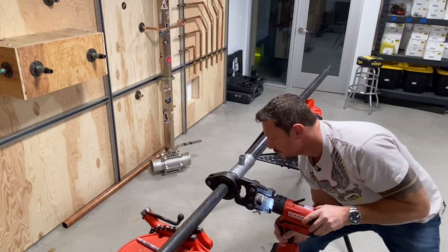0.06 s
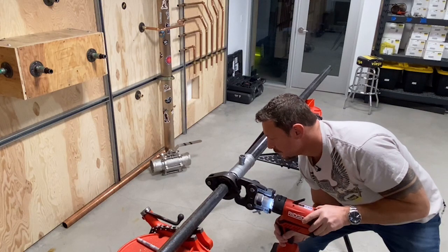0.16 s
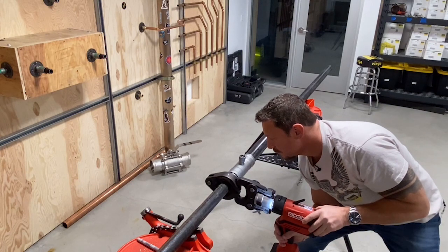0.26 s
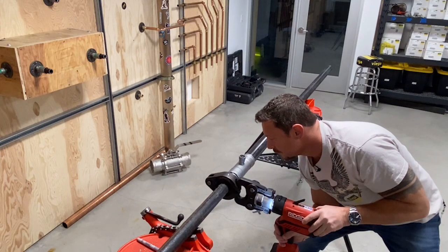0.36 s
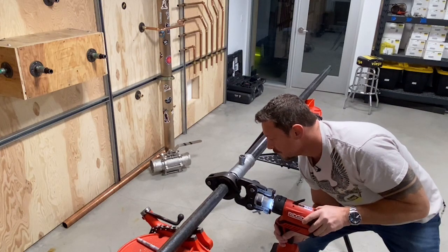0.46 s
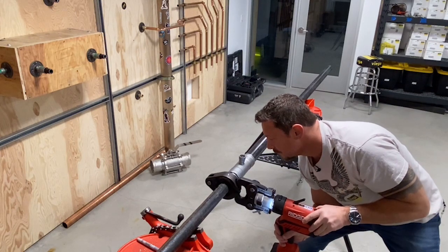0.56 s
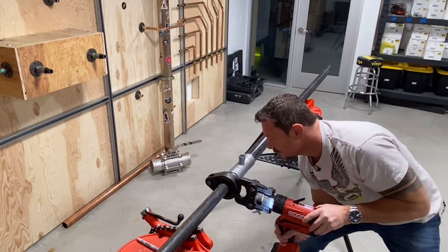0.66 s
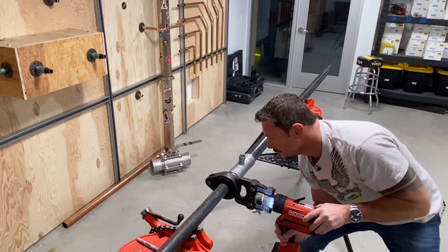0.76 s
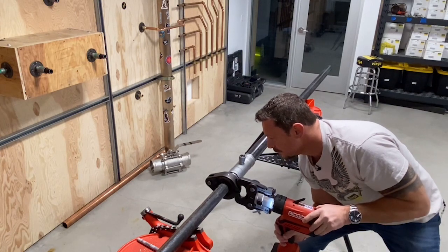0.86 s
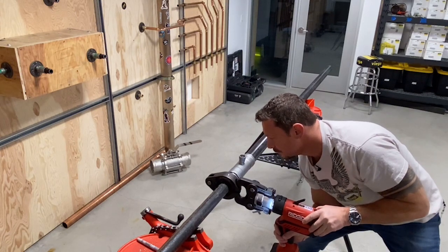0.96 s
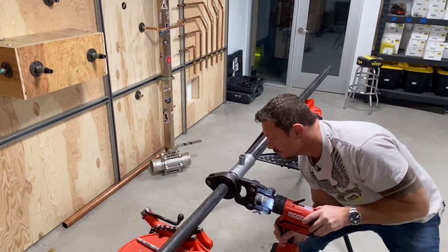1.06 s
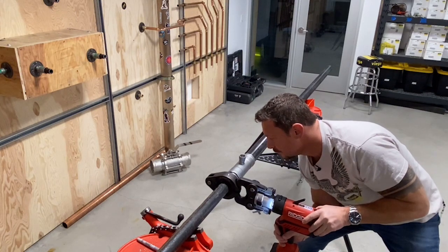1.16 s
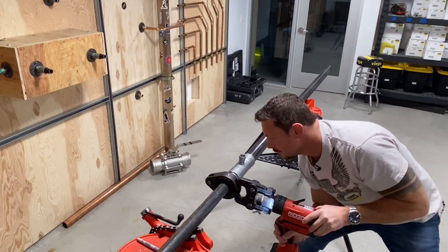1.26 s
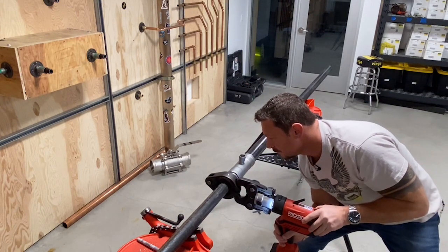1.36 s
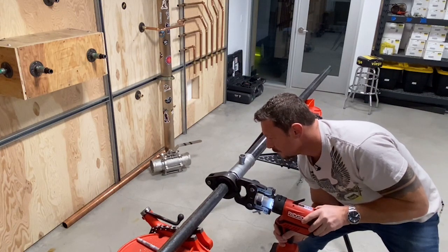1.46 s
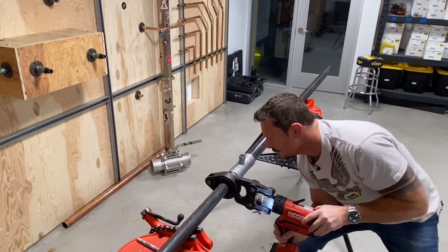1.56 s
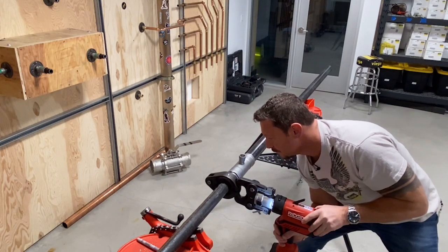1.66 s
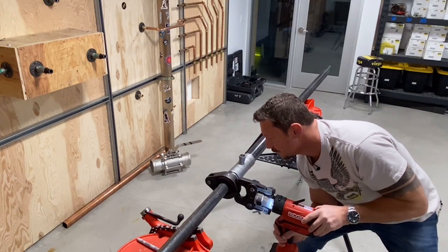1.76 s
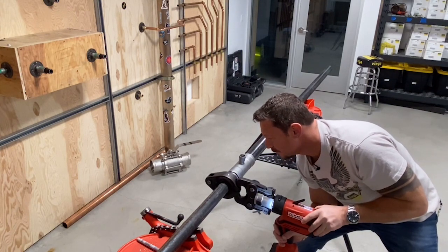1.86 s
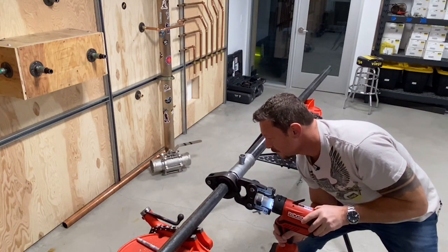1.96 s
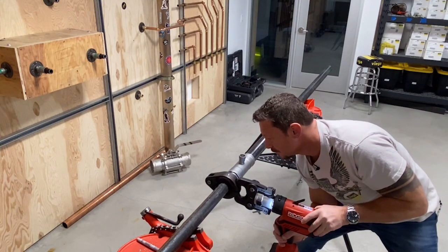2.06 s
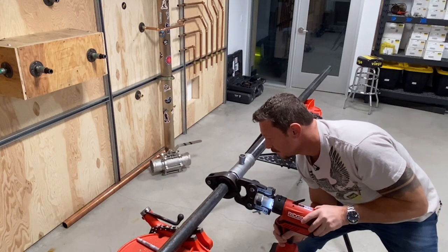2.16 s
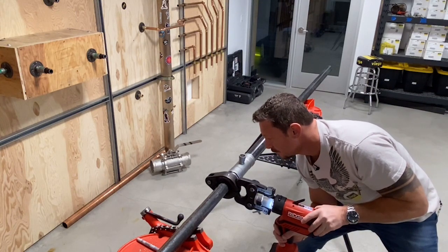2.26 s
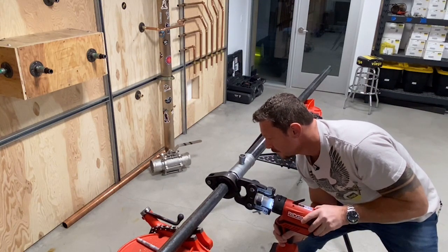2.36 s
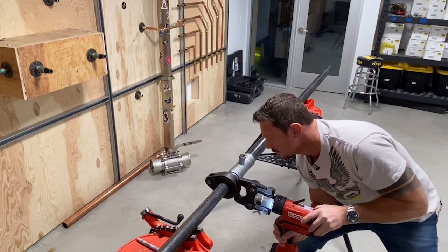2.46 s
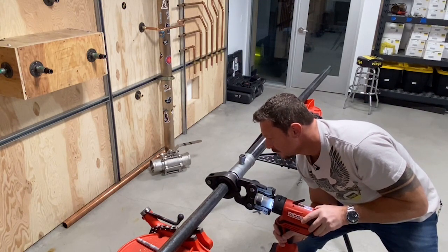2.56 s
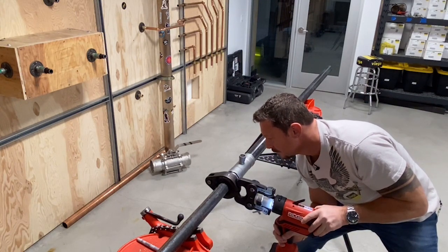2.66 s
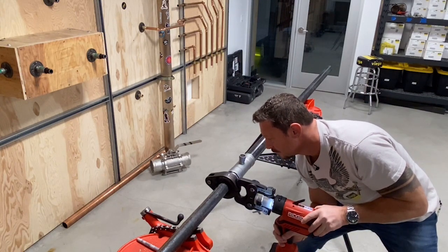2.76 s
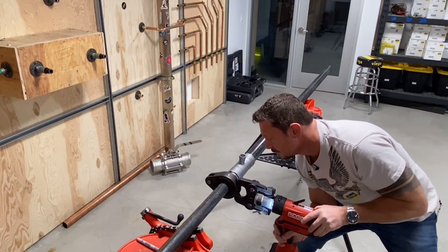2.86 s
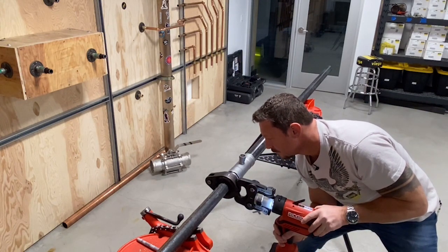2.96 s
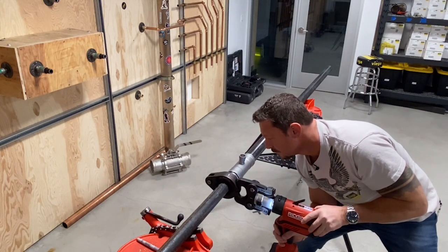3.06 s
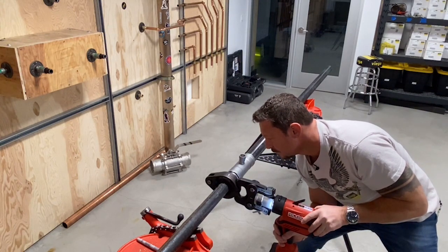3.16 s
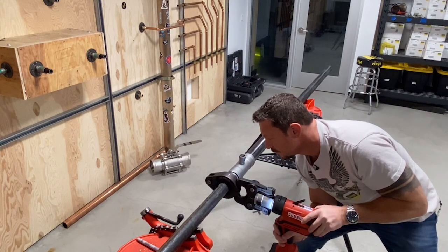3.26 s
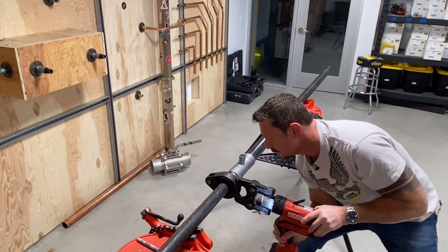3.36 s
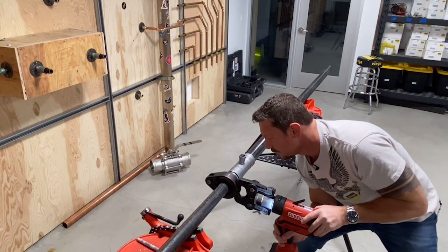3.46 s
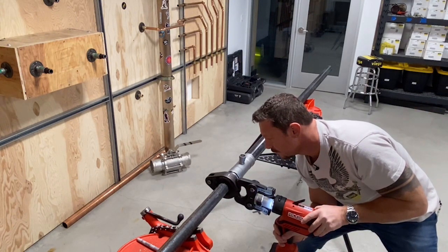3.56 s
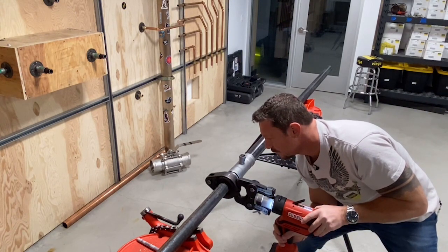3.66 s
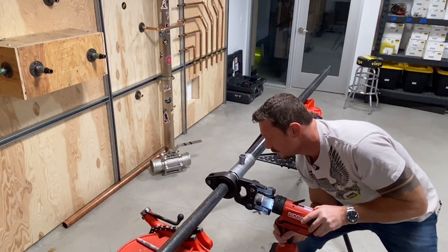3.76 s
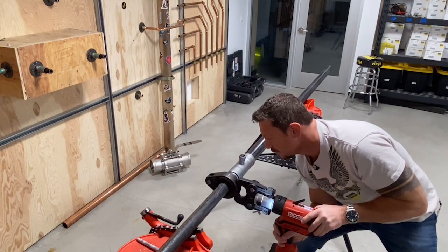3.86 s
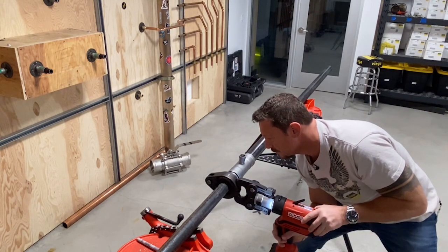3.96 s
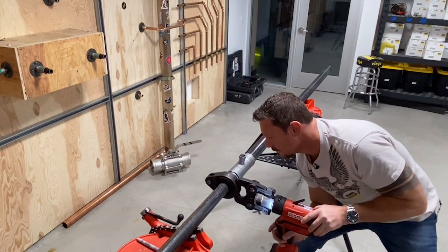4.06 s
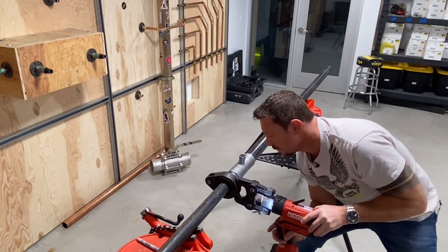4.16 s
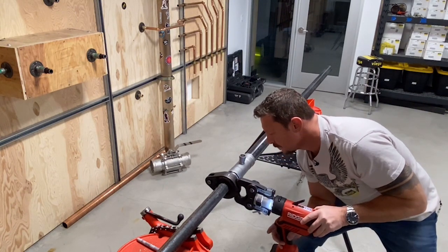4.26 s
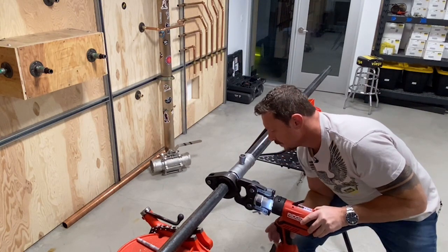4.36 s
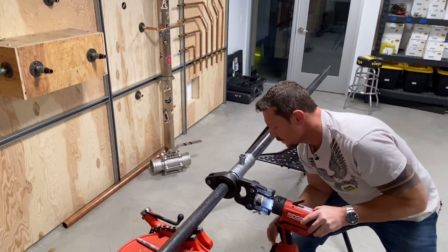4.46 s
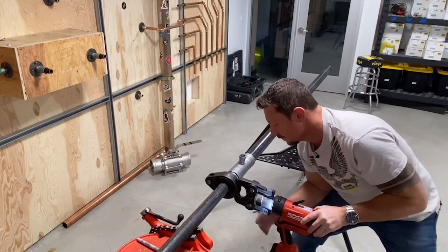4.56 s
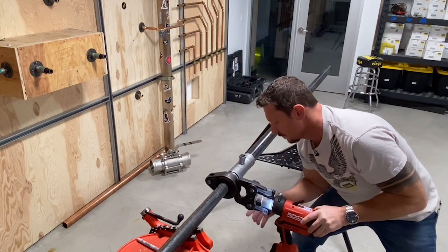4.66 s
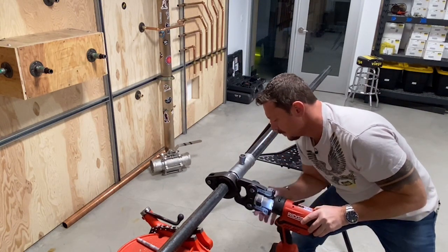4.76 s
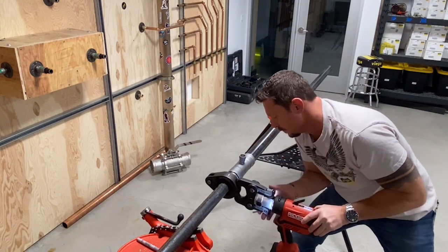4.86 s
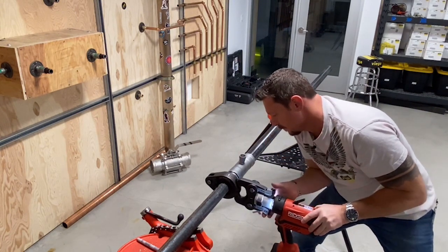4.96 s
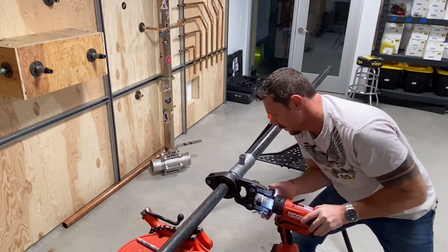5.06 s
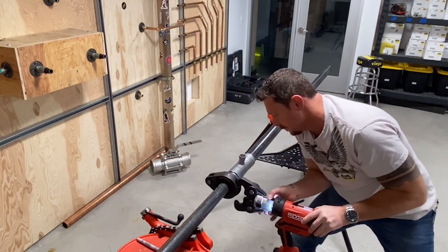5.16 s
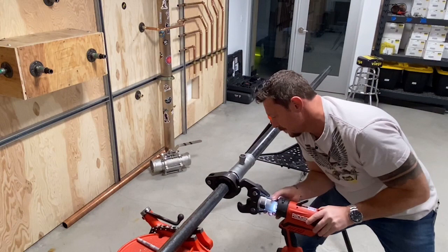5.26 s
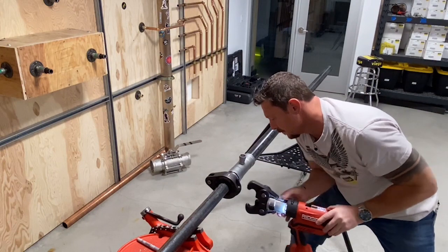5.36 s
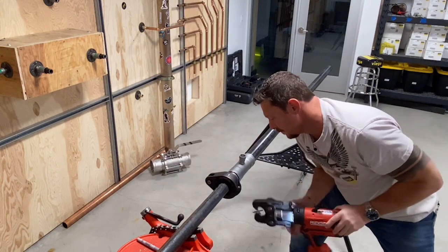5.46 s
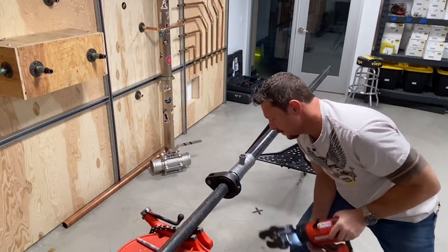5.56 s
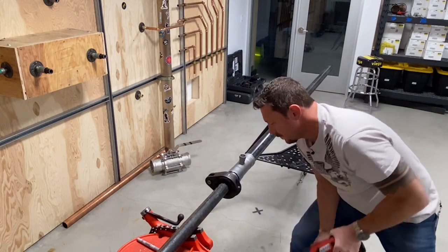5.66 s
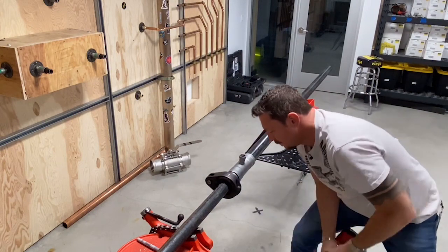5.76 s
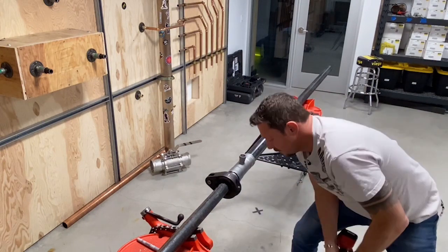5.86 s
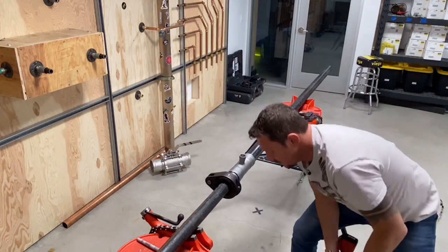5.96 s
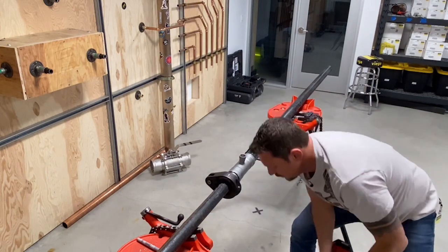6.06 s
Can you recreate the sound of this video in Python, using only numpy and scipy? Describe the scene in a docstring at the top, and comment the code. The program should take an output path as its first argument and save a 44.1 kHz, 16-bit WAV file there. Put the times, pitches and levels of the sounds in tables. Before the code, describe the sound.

A faint motor whine dies away at the very start, over the soft, low rush of workshop ventilation that continues throughout. At about 0.2 seconds a battery hydraulic press tool spins up and runs with a buzzing gear whine and a very fast pump pulse. Its pitch sinks gradually as it crimps a steel pipe fitting, then sags more clearly from 3.2 seconds. At about 3.8 seconds a valve pops and the motor stops abruptly. A tiny tick and a very faint hiss of oil follow between 4.2 and 5 seconds. At 5.25 seconds the steel jaws snap shut with a loud, bright clack and a slight ring. At 5.5 seconds they clash again in a quick, fading rattle, and there is one faint tick near 6 seconds. The tool sounds fairly close, with a short echo from hard walls.

```python
"""A battery hydraulic press crimps a steel pipe fitting in a ventilated, hard-walled workshop.
First the whine of a previous squeeze dies away. The trigger starts the geared motor, which drives a
piston pump and sags in every stroke as pressure builds, until the relief valve pops and the motor brakes.
Oil hisses back, then the steel jaws snap shut off the fitting and rattle as the tool swings down."""
import sys
import numpy as np
from scipy import signal
from scipy.fft import rfft, irfft
from scipy.io import wavfile
from scipy.ndimage import uniform_filter1d

SR = 44100
rng = np.random.default_rng(int(sys.argv[2]) if len(sys.argv) > 2 else 0)


def transcribe(u):
    """Save the signal u as a 16-bit wav file named by the first command-line argument.

    u: samples, shape (n,) or (channels, n), limited to [-1, 1]; the rate is SR.
    q: integer samples, one column per channel.
    """
    v = np.clip(np.atleast_2d(u).T, -1, 1)
    q = np.round(v * 32767).astype(np.int16)
    wavfile.write(sys.argv[1], SR, q)


N = 269010
T = np.arange(N) / SR


def amp(db):
    """Amplitude grows tenfold for every 20 dB."""
    return 10 ** (np.asarray(db) / 20)

def unit(x):
    """Normalisation to an rms of one."""
    return x / np.sqrt(np.mean(x ** 2) + 1e-20)

def at_hz(points, hz):
    """Interpolation of (Hz, value) points on a logarithmic frequency axis."""
    f, value = np.transpose(points)
    return np.interp(np.log(hz + 1), np.log(f + 1), value)

def tint(x, spectrum):
    """Spectral shaping by (Hz, dB) points, at an rms of one."""
    gain = amp(at_hz(spectrum, np.fft.rfftfreq(len(x), 1 / SR)))
    return unit(irfft(rfft(x) * gain, len(x)))

def noise(spectrum, size=N):
    """Filtered white noise takes on the spectrum of its filter."""
    return tint(rng.standard_normal(size), spectrum)

def wander(hz):
    """Low-passed noise gives a smooth random modulation."""
    lowpass = np.exp(-(np.fft.rfftfreq(N, 1 / SR) / hz) ** 2)
    return unit(irfft(rfft(rng.standard_normal(N)) * lowpass, N))

def swell(start, attack, stop, release_db_per_s):
    """An envelope of linear rise, hold and exponential decay."""
    return np.clip((T - start) / attack, 0, 1) * amp(-release_db_per_s * np.maximum(T - stop, 0))

def ring(modes, size, scatter=0):
    """Free vibration is a sum of damped modes; their phases scatter with the spot that is struck."""
    t = np.arange(size, dtype=np.float32) / SR
    return sum((-1) ** k * amp(db - 60 * t / t60) * np.sin(2 * np.pi * (hz * t + scatter * rng.random()))
               for k, (hz, db, t60) in enumerate(modes))

def add(mix, start_s, sound):
    """Superposition: a sound adds to the mix from its start time."""
    part = mix[round(start_s * SR):][:len(sound)]
    part += sound[:len(part)]

def no_bass(x, corner_hz=130):
    """A high-pass filter takes away the deepest bass."""
    return signal.lfilter(*signal.butter(2, corner_hz, "high", fs=SR), x)


# Spectrum of the moving air. Each row: frequency in Hz, relative spectral level in dB.
AIR_SPECTRUM = [(15, -40.5), (25, -12), (69, -15), (98, -3.5), (135, -6), (181, -6), (326, -7),
                (450, -13.5), (488, -16), (558, -17.5), (2240, -31), (6040, -39), (7280, -41),
                (15000, -50.5)]
def ventilation():
    """Steady airflow makes broadband noise, strongest in the bass."""
    return amp(-48.5) * noise(AIR_SPECTRUM)

# Decay of the workshop. Each row: frequency in Hz, reverberation time in seconds.
ROOM_DECAY = [(150, .6), (600, .7), (1600, .95), (3000, .88), (4500, .72), (7000, .52), (10000, .39),
              (15000, .27)]
def room(x, wet_db=-11, early_db=-11, build_s=0.0024):
    """Reverberation: early reflections off floor and plywood wall, then a tail absorbed most in treble."""
    age = T[:SR]
    reflections = rng.standard_normal(SR) * (rng.random(SR) < 4000 / SR)
    hz, t, bands = signal.stft(reflections, SR, nperseg=256)
    decay = amp(-60 * t / at_hz(ROOM_DECAY, hz)[:, None])
    tail = signal.istft(bands * decay, SR, nperseg=256)[1][:SR] * (1 - np.exp(-age / build_s))
    early = rng.standard_normal(SR) * (rng.random(SR) < 900 / SR) * np.exp(-age / 0.012) * (age > .003)
    echo = amp(wet_db - 5.5) * tail / np.linalg.norm(tail) + amp(early_db) * early / np.linalg.norm(early)
    return x + signal.fftconvolve(x, echo)[:N]

def lingering_whine(strokes_per_s=55.1, t60=0.71):
    """Reverberant decay: the whine of a previous squeeze of the trigger dies exponentially."""
    tones = whine(strokes_per_s * T + 0.0027 * wander(15), 0, throb=.5, waver=0.36)
    dull = signal.lfilter(*signal.butter(3, 2400, fs=SR), tones + .5 * noise(FLAW_SPECTRUM))
    return amp(-36 - 60 * T / t60) * dull

# Hiss of the oil. Each row: frequency in Hz, relative spectral level in dB.
OIL_SPECTRUM = [(800, -19), (2500, -4), (4500, 1), (6500, -11.5), (9000, -17), (15500, -16.5)]
def oil_return():
    """Flow noise swells, holds and fades as the ram comes home."""
    return amp(-66.5) * swell(start=4.1, attack=0.53, stop=4.84, release_db_per_s=46) * noise(OIL_SPECTRUM)

# Modes of the relief valve. Each row: frequency in Hz, relative level in dB, 60 dB decay time in seconds.
RELIEF_MODES = [(220, -8, 0.018), (362, 1.5, 0.018), (470, 1, 0.011), (1097, -3, 0.012)]
def relief_valve():
    """Impulse excitation: the valve opens at peak pressure with a crack and a damped pop."""
    out = np.zeros(N)
    add(out, 3.8362, amp(-1) * ring(RELIEF_MODES, size=6000))
    add(out, 3.836, amp(-9) * noise(CRACK_SPECTRUM, size=1000) * np.exp(-T[:1000] / .0012))
    return out

# Crack of steel on steel. Each row: frequency in Hz, relative spectral level in dB.
CRACK_SPECTRUM = [(60, -23), (300, -11.5), (700, -5.5), (1300, -0.5), (2200, -4), (3000, 1.5), (4300, 5),
                  (5400, -6), (7000, 0.5), (9500, -5.5), (15000, -7.5)]
# Modes of the tool body. Each row: frequency in Hz, relative level in dB, 60 dB decay time in seconds.
BODY_MODES = [(816, -15, 0.013), (1070, 3, 0.01), (1480, 2, 0.033)]
def blow(modes, db, contact_s, ring_db, knock_db, cutoff_hz, size=12000):
    """An impact gives brief contact noise and excites the modes of the jaws and the tool body."""
    crack = noise(CRACK_SPECTRUM, size) * np.exp(-T[:size] / contact_s)
    ringing = amp(ring_db) * ring(modes, size, scatter=0.76)
    knock = amp(knock_db) * ring(BODY_MODES, size)
    lowpass = signal.butter(1, min(cutoff_hz, .45 * SR), fs=SR)
    return amp(db) * signal.lfilter(*lowpass, crack + ringing + knock)

# Modes of the steel jaws. Each row: frequency in Hz, relative level in dB, 60 dB decay time in seconds.
JAW_MODES = [(760, -12, 0.044), (1410, -16, 0.26), (1755, -10, 0.42), (2720, -9.5, .05), (3295, -13, 0.2),
             (3800, -2.5, 0.046), (4400, 3, 0.13), (4650, -0.5, 0.18), (5566, -12, .08), (6770, -7, 0.26),
             (7720, -5, 0.2), (8600, -6.5, .15), (10370, -10.5, 0.21), (10850, -5.5, .1),
             (11500, -6.5, 0.21), (13850, -15.5, .1), (14930, 0, .17)]
# Light ticks as the tool is handled. Each row: start in seconds, gain in dB.
HANDLING_TICKS = [(4.2443, -46), (5.989, -49)]
def jaws(snap_s=5.2531, clash_s=5.519, first_gap_s=.0356, restitution=.745, split_hz=24):
    """Stick-slip ends in a snap; then inelastic bounces follow, each sooner, softer and duller."""
    out = np.zeros(N)
    # arms and side plates are nearly alike, so every mode splits into a close cluster
    modes = [(hz + offset * split_hz + 0.0028 * hz * rng.uniform(-1, 1), db, t60)
             for hz, db, t60 in JAW_MODES for offset in (-1.5, -.5, .5, 1.5)]
    for lead_s in .048 * .46 ** np.arange(4):  # ever harder slips off the fitting
        slip = blow(modes, db=-19 - 519.5 * lead_s, contact_s=.006,
                    ring_db=-32, knock_db=-9, cutoff_hz=3500)
        add(out, snap_s - lead_s, slip)
    add(out, snap_s, blow(modes, db=3, contact_s=0.0065, ring_db=-24, knock_db=-27, cutoff_hz=20000))
    for k in range(6):  # swung down, the jaws clash; lighter bounces ring more freely
        bounce = blow(modes, db=0.5 - 3.5 * k, contact_s=0.004 * 0.96 ** k,
                      ring_db=-30 + 0.2 * k, knock_db=-11.5, cutoff_hz=10000 * 0.77 ** k)
        add(out, clash_s, bounce)
        clash_s += first_gap_s * restitution ** k
    for start_s, db in HANDLING_TICKS:
        add(out, start_s, blow(modes, db, contact_s=0.00116, ring_db=-44, knock_db=-36, cutoff_hz=14000))
    out = no_bass(out, corner_hz=220)
    add(out, snap_s, ring([(40, -35, .12), (108, -29.5, 0.1)], size=12000))  # low thump under the snap
    return out

def lobe(strokes, centre, width):
    """A periodic pulse: one smooth bump in every pump stroke."""
    return np.exp((np.cos(2 * np.pi * (strokes - centre)) - 1) / (2 * np.pi * width) ** 2)

# Rattle of gears and bearings. Each row: frequency in Hz, relative spectral level in dB.
FLAW_SPECTRUM = [(100, -35), (350, -4), (800, -3), (1300, 1), (1800, 3.5), (2200, -5.5), (3200, 2),
                 (5000, 2), (6200, -6.5), (8000, -9), (11000, -13.5), (15500, -16)]
def gear_rattle(angle, strokes, load):
    """Roughness excitation: the same surface flaws recur every stroke, over a hiss that never repeats."""
    flaws = signal.resample(rng.standard_normal(size=780), 8192)
    worn = tint(np.interp(angle % 1, np.linspace(0, 1, len(flaws)), flaws), FLAW_SPECTRUM)
    contact = amp(-10) * worn + amp(-13) * noise(FLAW_SPECTRUM)
    return amp(2.7 * load) * contact * (.5 + lobe(strokes, 0.09, 0.23))

# Modes of the check valve. Each row: frequency in Hz, relative level in dB, 60 dB decay time in seconds.
CHECK_VALVE_MODES = [(424, -16.5, 0.019), (595, -7, 0.015), (908, 0, 0.0074), (1155, -0.5, 0.01),
                     (1650, -7, 0.0045)]
def check_valve(strokes, load):
    """An impulse train: the valve knocks shut after each push, later in the stroke under pressure."""
    closing_phase = np.interp(load, [.2, .55, 1], [.185, .29, .25])
    shut = np.diff(np.floor(strokes - closing_phase), prepend=0) > 0
    force = np.interp(load, [.04, .22, 1], [.15, 1, .85]) * (1 + 0.046 * wander(40))
    return amp(9.5) * signal.oaconvolve(shut * force, ring(CHECK_VALVE_MODES, size=2000))[:N]

# Tones of shaft, bearings and planet gears. Each entry: order in cycles per stroke.
SHAFT_ORDERS = (6, 14, 22, 25, 33, 37, 42, 48, 50, 54, 64, 71, 93)
# Strength of those orders. Each row: relative level in dB running free, at work, and near stall.
ORDER_LEVELS = [(-28, -34.5, -36.5), (-32.5, -23, -41), (-19.5, -29, -39), (-23.5, -9.5, -24),
                (-13.5, -33, -30.5), (-15, -22, -16), (-19, -29.5, -33), (-11, -35, -33.5),
                (-20, -22.5, -28), (-23.5, -27, -28), (-19.5, -33, -2), (-0.5, -18, -10), (-31, -20, -6)]
def whine(angle, load, throb=0.12, waver=.17, turns_per_stroke=6):
    """Rotational orders follow shaft speed, vary with load and are amplitude-modulated by planet gears."""
    angle = angle + 0.00063 * wander(140)  # bearing play blurs the highest tones
    tones = 0
    for order, levels in zip(SHAFT_ORDERS, ORDER_LEVELS):
        db = np.interp(load, [.12, .58, .82], levels)
        tones = tones + amp(db) * np.cos(2 * np.pi * (order * angle + rng.random()))
    planets = 1 + throb * np.cos(2 * np.pi * turns_per_stroke / 2 * angle)
    return tones * planets * (1 + waver * wander(200))

# Resonances of the housing. Each row: frequency in Hz, bandwidth in Hz, gain in dB.
HOUSING_MODES = [(1763, 124, -1.5), (3737, 120, -3.5), (5250, 460, -1), (6800, 240, -2), (8810, 430, -3),
                 (10600, 590, -4), (14100, 2100, -14)]
def housing(x, leak_db=-10):
    """Forced vibration: the shell radiates mostly at its resonances."""
    f = np.fft.rfftfreq(N, 1 / SR)
    shell = sum(amp(db) * 1j * f * width / (hz ** 2 - f ** 2 + 1j * f * width)
                for hz, width, db in HOUSING_MODES)
    return irfft(rfft(x) * (shell + amp(leak_db)), N)

# Harmonics of the gear mesh. Each row: relative level in dB running free, the same under pressure,
# moment of its flare in strokes, width of the flare in strokes.
MESH_HARMONICS = [(-19.5, -3, 0.048, 0.23), (-2.5, -9, -0.12, 0.1), (-9, 0, 0.038, 0.08),
                  (-10.5, -3.5, 0.052, 0.11), (-18.5, -6, 0.13, 0.094), (-21, -12, 0.037, 0.089),
                  (-26, -16.5, 0.032, .12), (-23, -23, -.03, 0.11)]
def gears(angle, strokes, load, teeth=35, roughness=.1):
    """Gear meshing: tooth contact shifts as the piston pushes, so each harmonic flares in its turn."""
    loaded = np.clip(load / 0.6, 0, 1) ** 0.71
    mesh = 0
    for k, (free_db, full_db, moment, width) in enumerate(MESH_HARMONICS, 1):
        force = 0.16 / k ** (0.73 * loaded) + lobe(strokes, moment, width)
        gain = amp(free_db + (full_db - free_db) * loaded)
        mesh = mesh + force * gain * np.cos(2 * np.pi * (k * teeth * angle + 0.41 * rng.random()))
    return amp(7) * housing(-mesh * (1 + roughness * wander(900)))

def motor_sway(strokes, speed, load, push_phase, ripple=0.021, sag=0.1315):
    """Frequency modulation: each push slows the motor, giving an angle offset in strokes."""
    torque = lobe(strokes, push_phase, width=0.15)
    lag = np.cumsum((torque - uniform_filter1d(torque, 8000)) * speed) / SR
    lag -= uniform_filter1d(lag, 4000)
    swing = -(ripple + sag * load) * unit(lag) / np.sqrt(2)  # fractional speed change within a stroke
    sway = np.cumsum(swing * speed) / SR
    return sway - uniform_filter1d(sway, 4000) + 0.00045 * wander(70)

# Pump speed once spun up. Each row: time in seconds, rate in strokes per second.
PUMP_SPEED = [(0.27, 54.13), (0.46, 55.2), (0.61, 54.35), (0.76, 51.53), (1.2, 50.11), (1.52, 48.55),
              (1.72, 48.27), (1.92, 46.86), (2.08, 47.72), (2.28, 46.69), (2.54, 47.56), (2.8, 46.43),
              (3.2, 47.11), (3.6, 43.22), (3.86, 39.54)]
# Oil pressure. Each row: time in seconds, load from 0 to 1.
OIL_LOAD = [(.2, 0), (.58, 0.04), (.76, .2), (2, .47), (3.2, 0.57), (3.5, 0.72), (3.83, 0.79)]
def drive(trigger_s=.19, spin_up_s=.08, kick_share=.47, cut_out_s=3.848, push_phase=0.034):
    """Phase locking: gears, shafts and valve share one rotation, so all slow as the pressure builds."""
    spin = np.interp(T, [trigger_s, trigger_s + spin_up_s], [kick_share, 1])
    spun_up = (spin - kick_share) / (1 - kick_share)
    speed = spin * np.interp(T, *np.transpose(PUMP_SPEED))
    load = np.interp(T, *np.transpose(OIL_LOAD))
    strain = load + 0.77 * (1 - spun_up)  # speeding up loads the teeth too
    strokes = np.cumsum(speed) / SR + .084  # the piston starts part way through a stroke
    sway = motor_sway(strokes, speed, load, push_phase)
    mesh = gears(strokes + sway, strokes, strain)
    shafts = spun_up * whine(strokes + .35 * sway, load)  # the rotor's inertia smooths the sag
    bearing_force = unit(1 + 0.65 * np.sqrt(load) * np.cos(2 * np.pi * (strokes - push_phase)))
    knocks = check_valve(strokes, load)
    rattle = gear_rattle(strokes + sway, strokes, strain)
    shake = amp(-37) * np.sin(2 * np.pi * strokes) * spin
    running = swell(trigger_s, attack=0.015, stop=cut_out_s, release_db_per_s=480)
    level = amp(-17.5 - 12.5 * (1 - spin) - 1.77 * load) * running
    return level * (no_bass(mesh + shafts * bearing_force + knocks + rattle) + shake)

def scene():
    """Superposition of the tool, its reflections and the ventilation, in one channel."""
    press = room(drive() + no_bass(oil_return() + relief_valve(), corner_hz=111.7))
    clatter = room(jaws(), wet_db=-9.5, early_db=-15.5)
    return (press + clatter + lingering_whine() + ventilation())[None]

def record(dry, ceiling=.9, cutoff_hz=15850):
    """Saturation rounds off the loudest blows; a low-pass filter then limits the band."""
    clipped = dry / (1 + (dry / ceiling) ** 6) ** (1 / 6)
    lowpass = signal.firwin(255, cutoff_hz, window=("kaiser", 8), fs=SR)
    return signal.oaconvolve(clipped, lowpass[None], "same")


dry = scene()
out = record(dry)
transcribe(out)
```